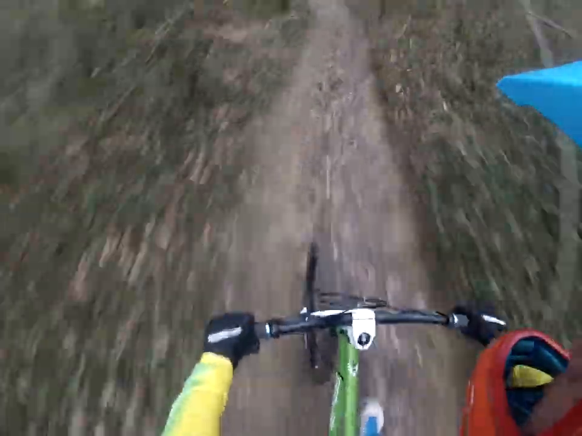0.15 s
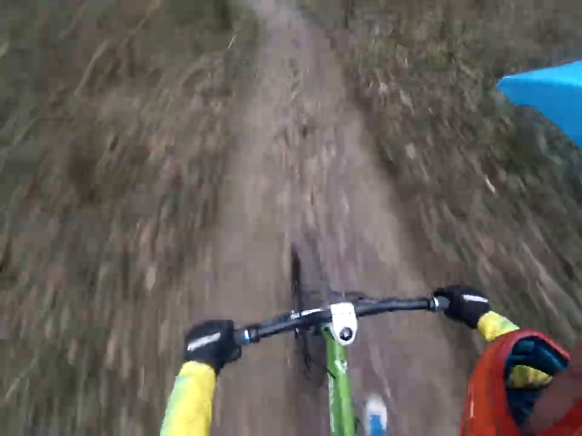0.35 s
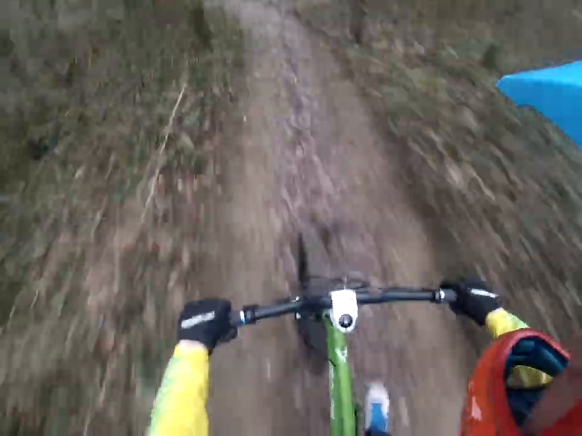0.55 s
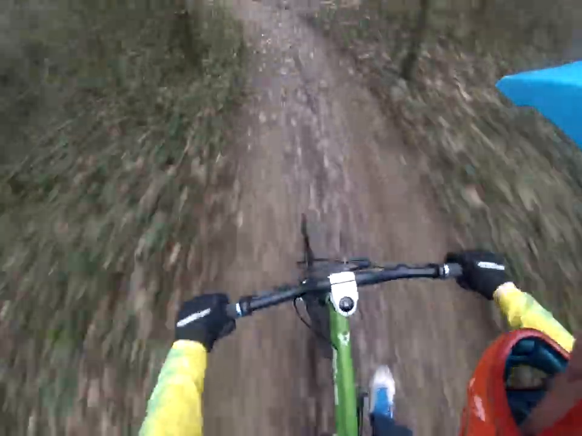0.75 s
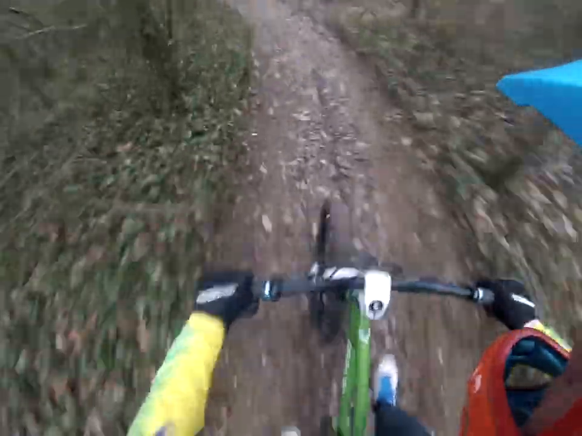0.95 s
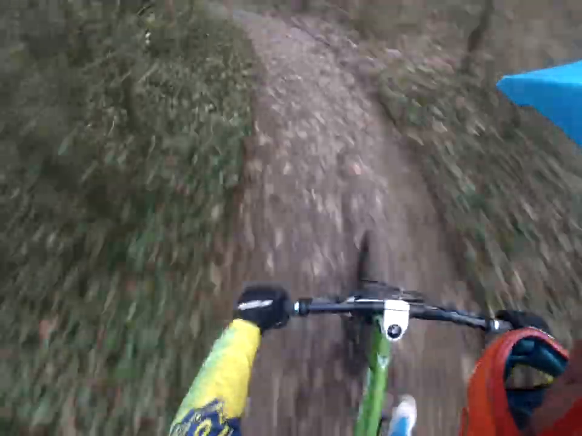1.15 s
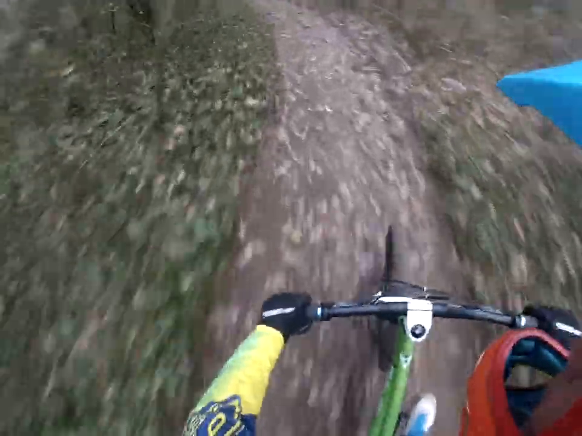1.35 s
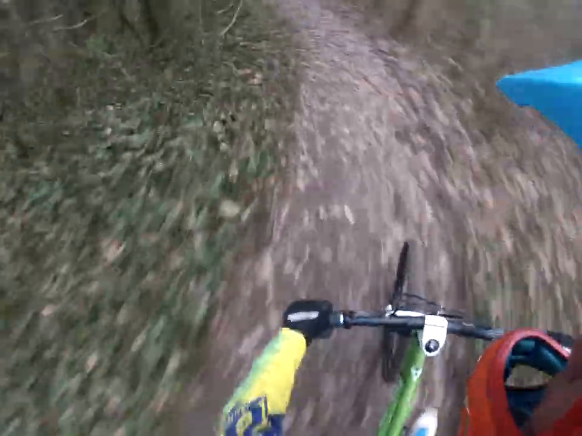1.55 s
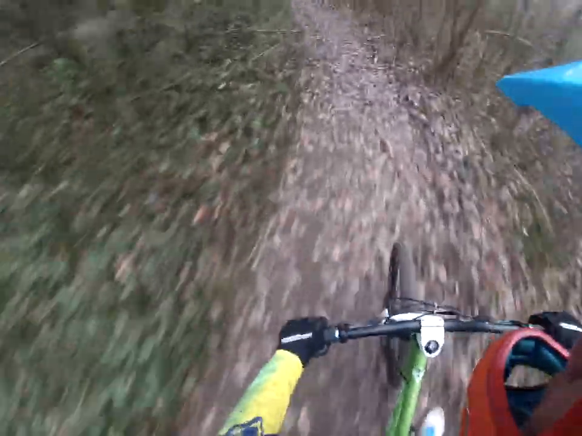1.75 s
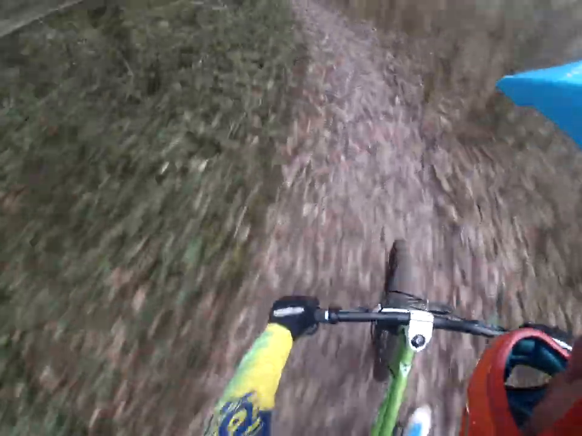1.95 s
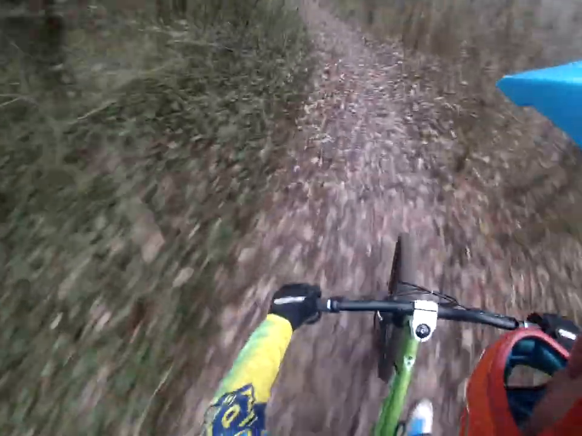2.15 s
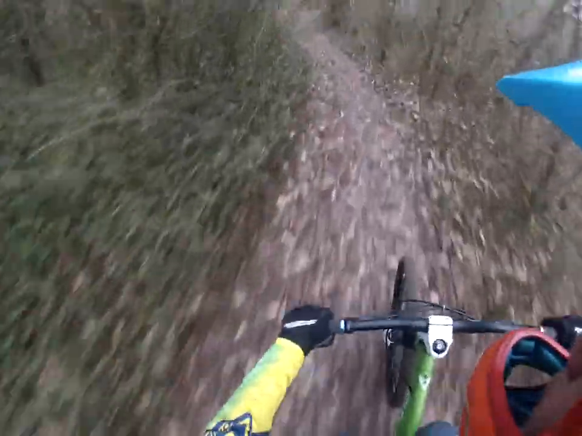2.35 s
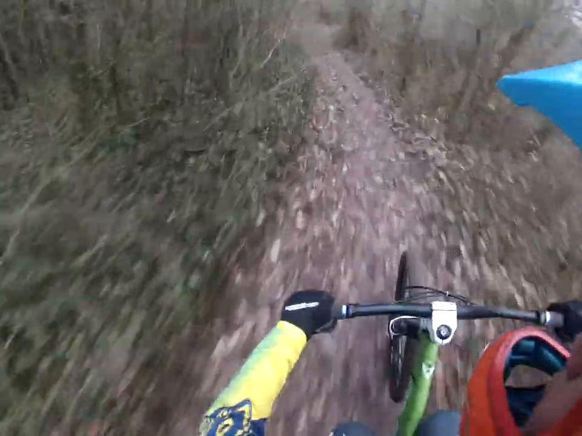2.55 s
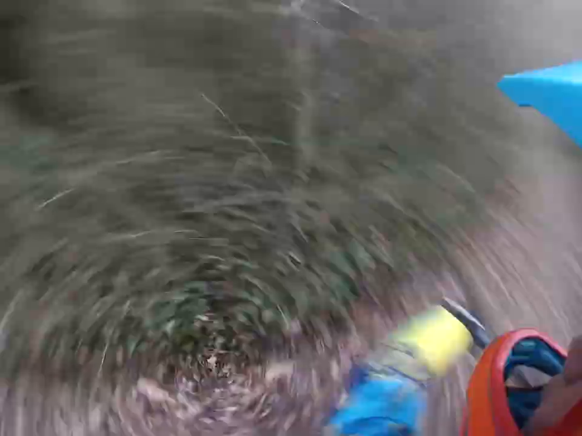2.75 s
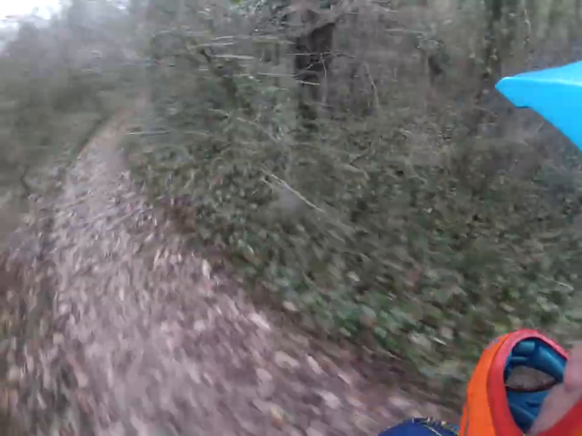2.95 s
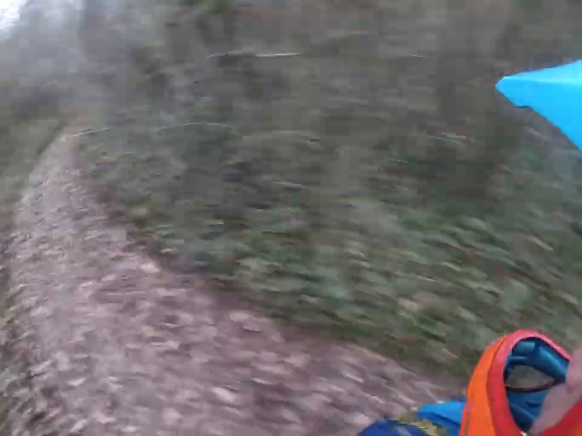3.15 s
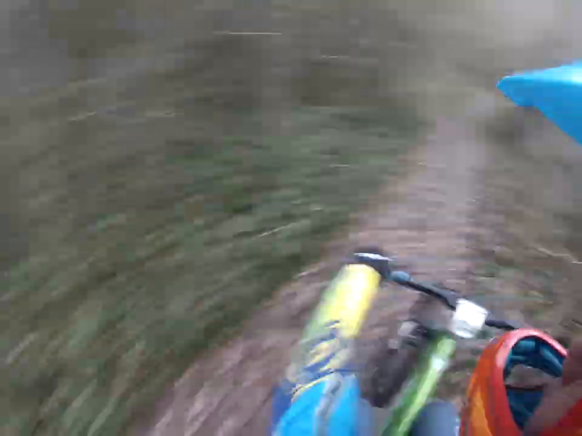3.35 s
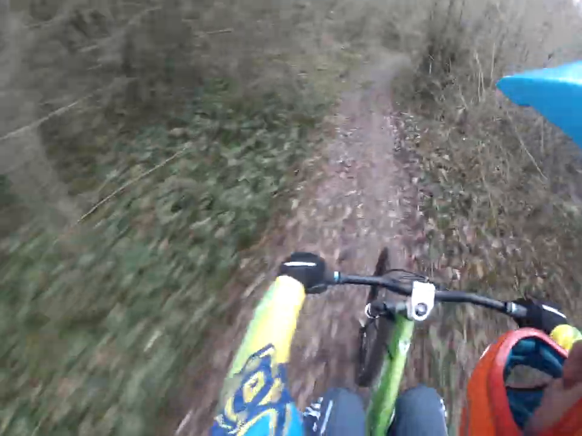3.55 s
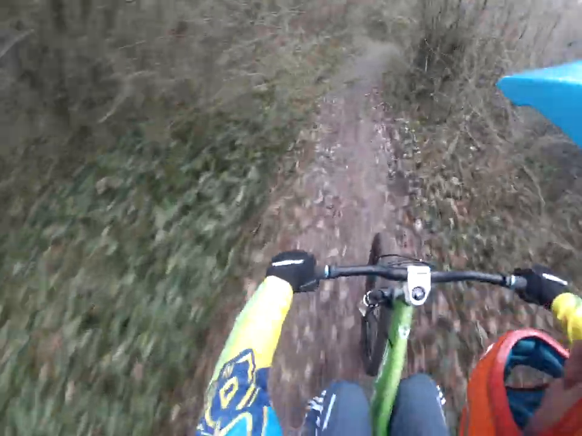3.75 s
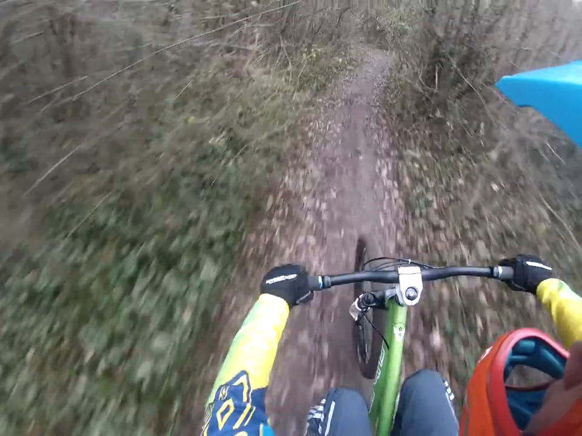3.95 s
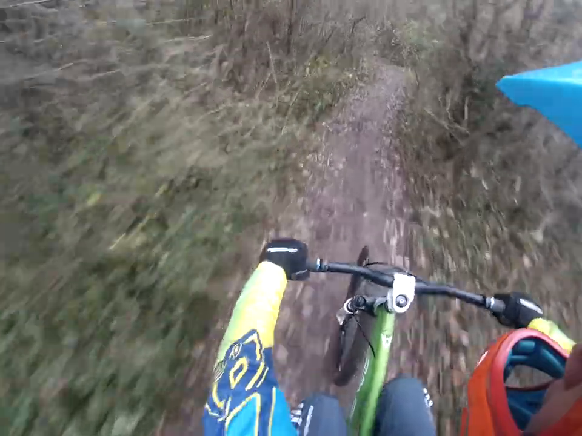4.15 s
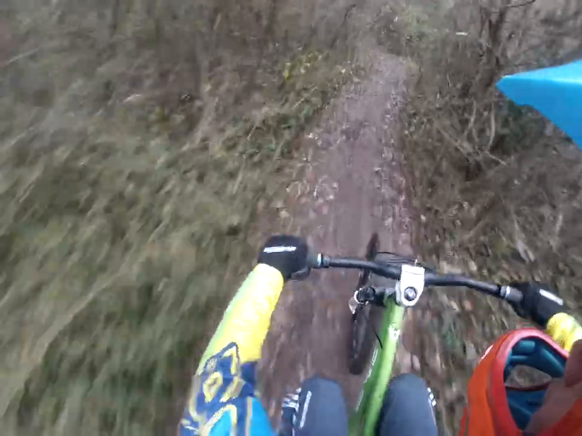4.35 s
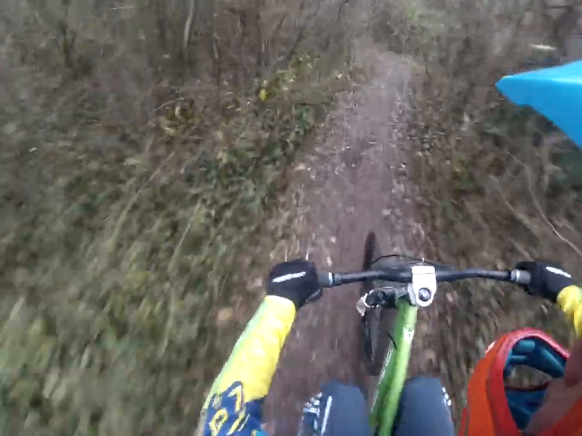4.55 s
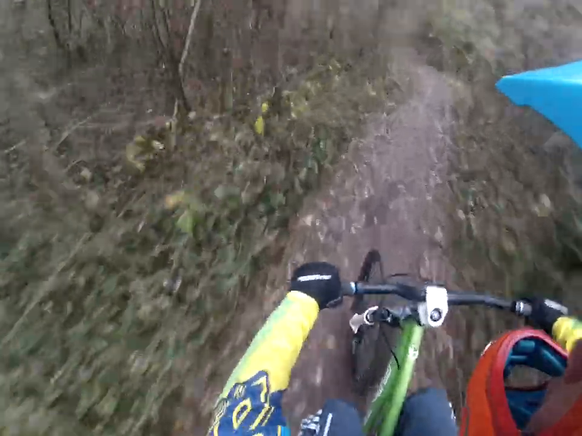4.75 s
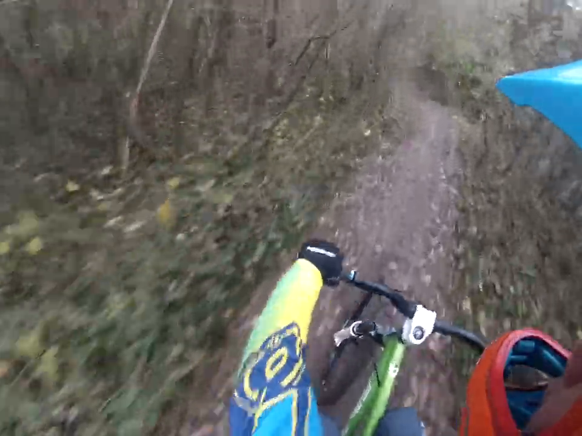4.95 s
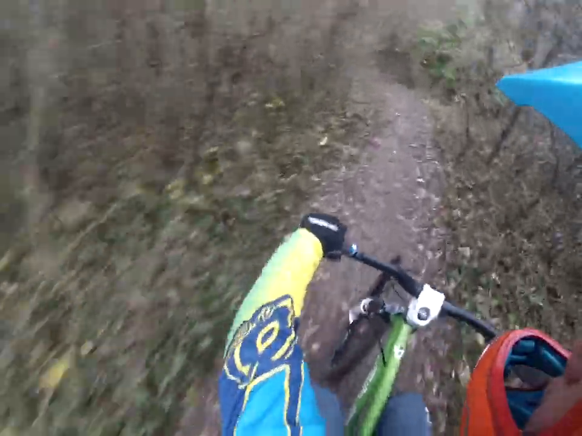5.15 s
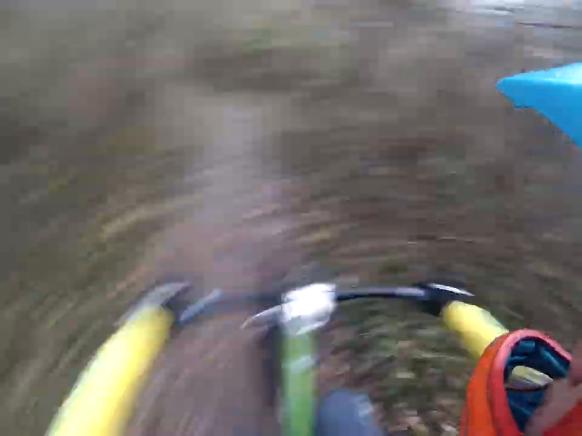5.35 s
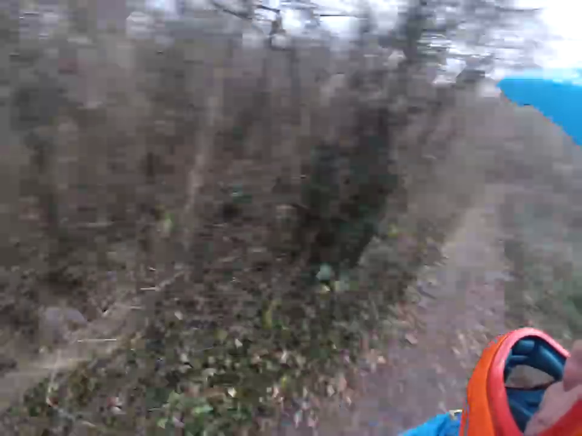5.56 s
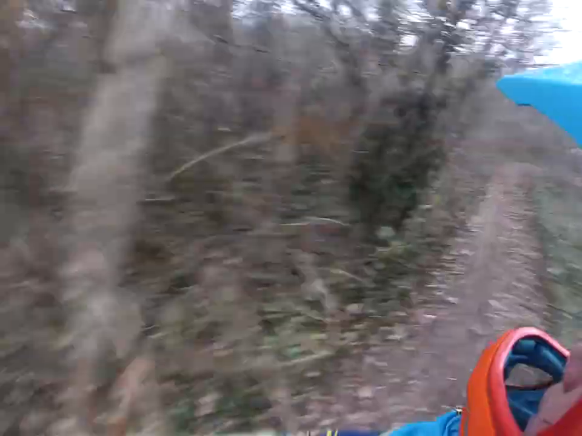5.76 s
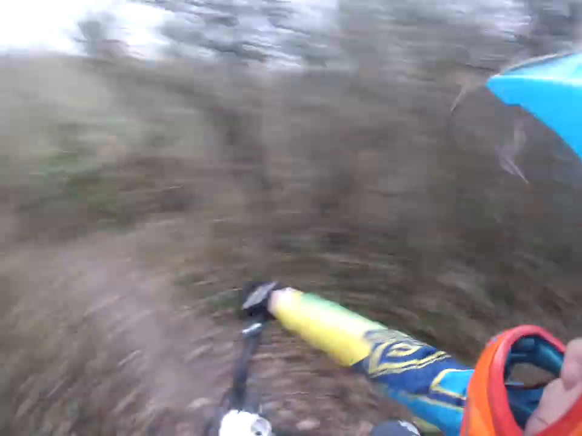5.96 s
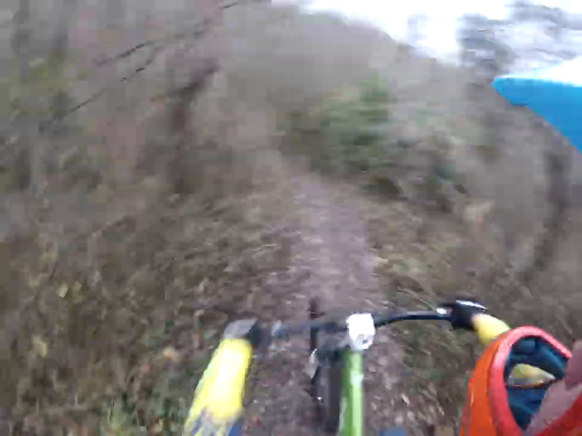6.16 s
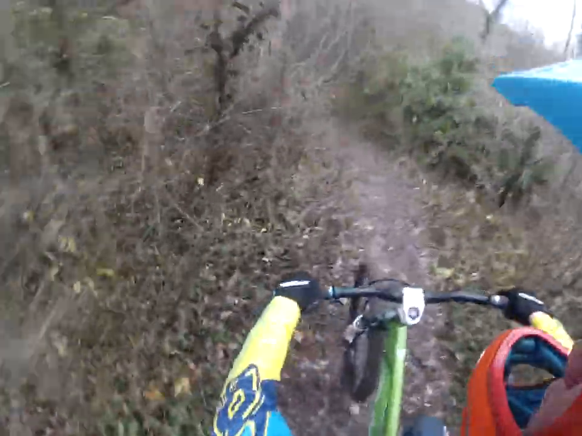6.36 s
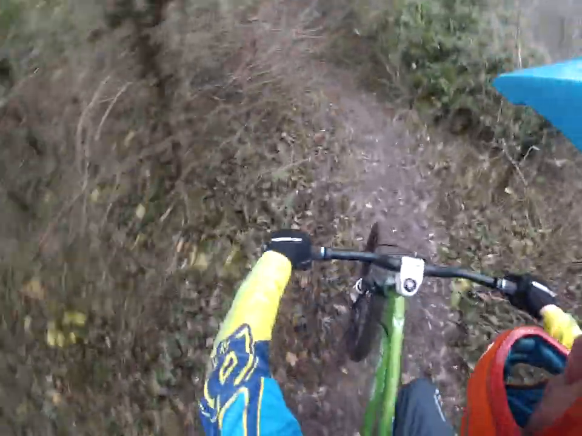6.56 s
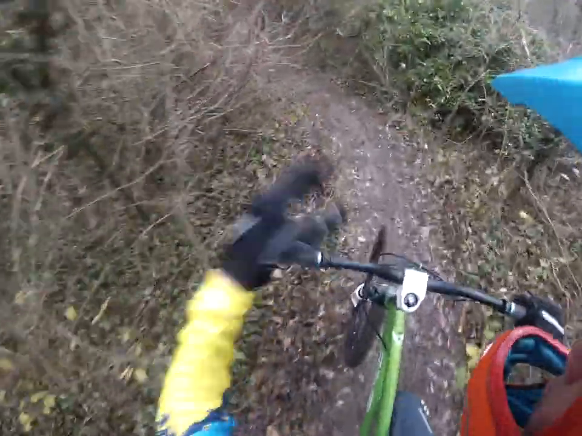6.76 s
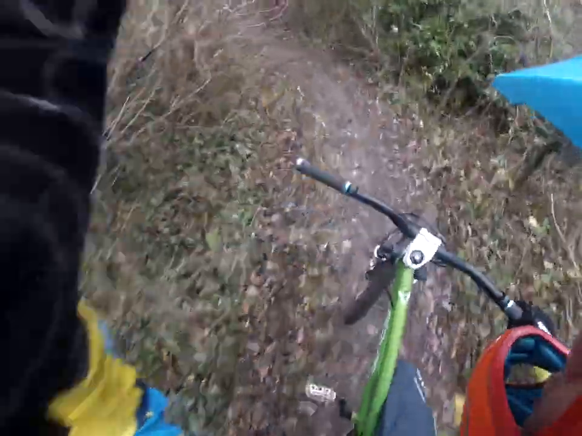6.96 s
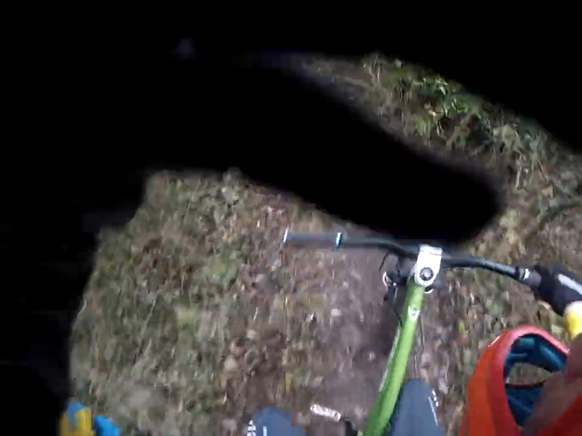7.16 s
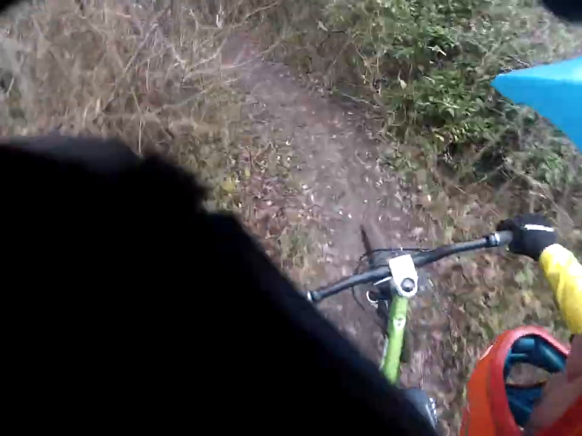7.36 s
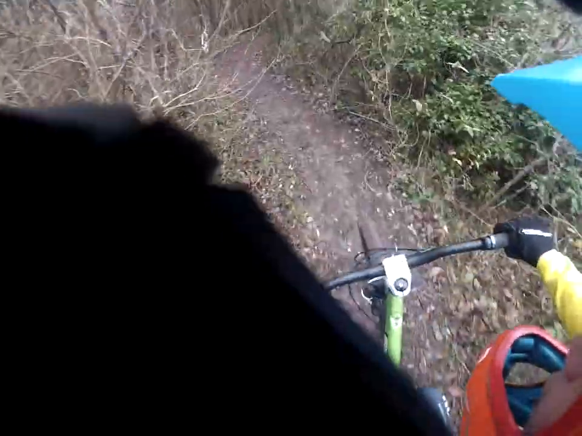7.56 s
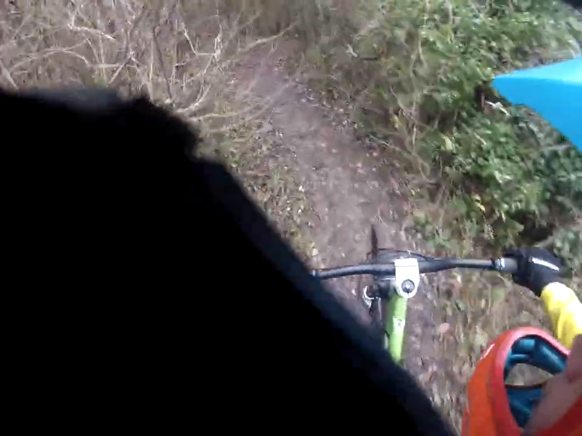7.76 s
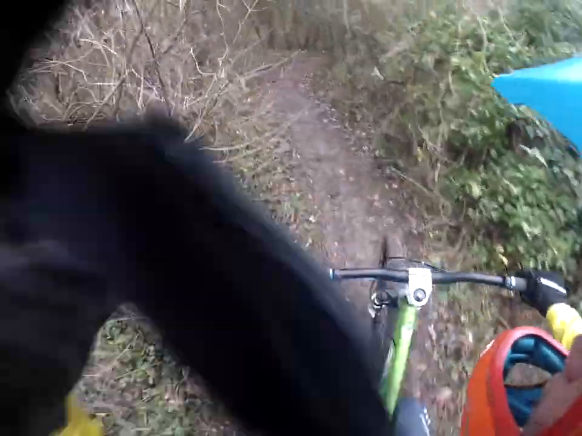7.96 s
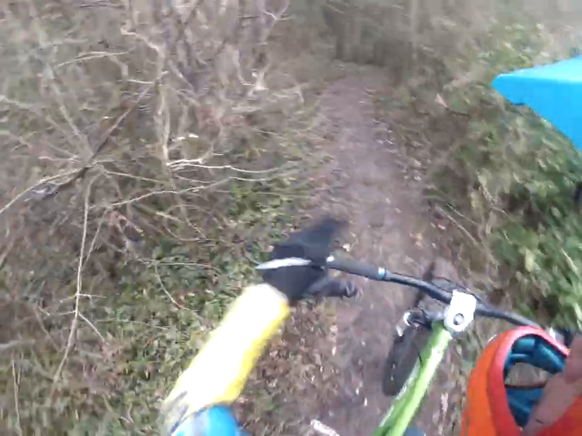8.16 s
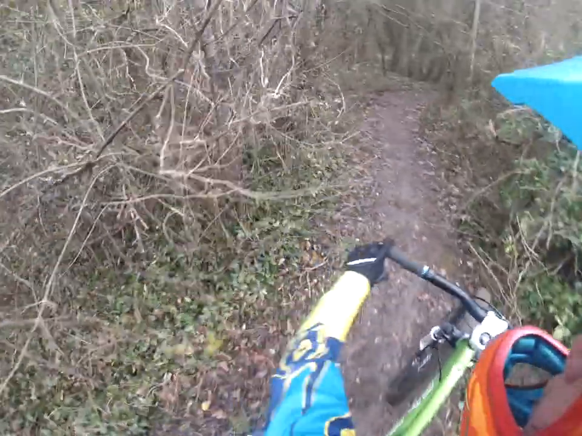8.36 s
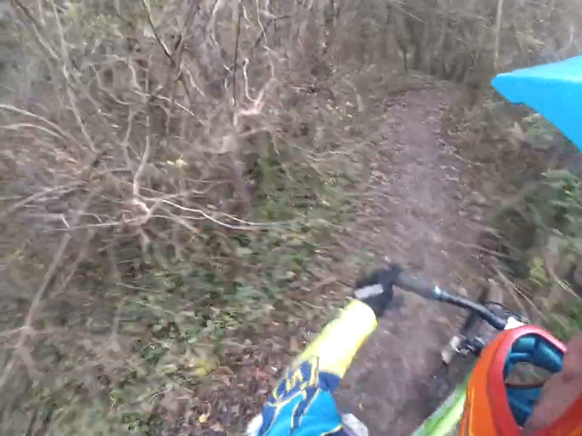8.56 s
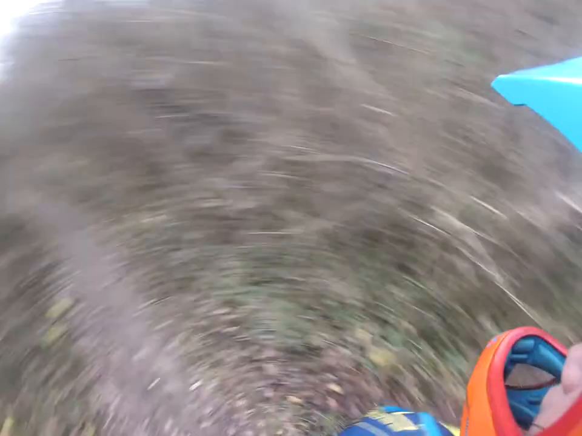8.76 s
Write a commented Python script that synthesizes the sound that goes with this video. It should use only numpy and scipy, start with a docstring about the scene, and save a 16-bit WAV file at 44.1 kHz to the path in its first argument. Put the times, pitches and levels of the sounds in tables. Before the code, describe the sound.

Helmet-mounted camera on a downhill mountain bike: low buffeting rumble, faint gritty tyre crunch, sharp mount knocks, then a gloved hand scraping and cracking loudly on the case.

```python
"""On a dirt trail a mountain bike runs downhill, heard from a camera in a plastic case on the rider's helmet.
Filtered noise gives buffeting, frame drone and hiss; random clicks give tyre crunch; jolts sway the helmet.
The helmet mount, a set of resonant modes, creaks under random slips and knocks under short blows.
Later a gloved hand grabs and wipes the case: stick-slip clicks drive its modes, and snags crack loudly.
After each release a damped hum and metal tones ring on; the latch clinks once."""
import sys
import numpy as np
from scipy import signal
from scipy.fft import rfft, irfft, next_fast_len
from scipy.io import wavfile
from scipy.ndimage import uniform_filter1d

SR = 44100
rng = np.random.default_rng(int(sys.argv[2]) if len(sys.argv) > 2 else 0)


def transcribe(signal):
    """Save signal, clipped to [-1, 1], as a 16-bit WAV file at the path in sys.argv[1]."""
    frames = np.atleast_2d(signal).T
    limited = np.clip(frames, -1, 1)
    pcm = np.round(limited * 32767).astype(np.int16)
    wavfile.write(sys.argv[1], SR, pcm)


N = 388080
TIME = np.arange(N) / SR
HUM_HZ = 102  # hum of the camera on its mount

# modes of the mount: (frequency [Hz], width [Hz], gain [dB])
MOUNT_MODES = [(197, 71, 2), (324, 29, 1), (500, 140, -11), (652, 96, -2.5), (1400, 113, 8.5),
               (1980, 120, -5), (2290, 120, -3), (2980, 160, -5.5), (3530, 300, -3.5)]
# modes of the case: (frequency [Hz], width [Hz], gain under a firm grip [dB], gain under a light wipe [dB])
CASE_MODES = [(1265, 160, -7, -9.5), (1596, 290, -2, -3), (2073, 140, -4, 7.5), (2194, 200, 2, -10),
              (2940, 250, -4.5, -10), (3390, 160, -11, -16), (4800, 430, -15.5, -13.5)]
# whistle of the rubbed case: (frequency [Hz], width [Hz], gain [dB])
WHISTLE_MODE = [(3789, 120, 1)]


def undb(db):
    """Level law: decibels to amplitude gain."""
    return 10 ** (np.asarray(db) / 20)


def unit(x):
    """Normalization: scale to an rms of 1."""
    return x / np.sqrt(np.mean(x ** 2))


def even(x, span_s):
    """Automatic gain: divide by the running rms, so that it stays near 1."""
    power = np.abs(uniform_filter1d(x ** 2, max(int(span_s * SR), 2)))
    return x / np.sqrt(power + 1e-12)


def add(out, s, x):
    """Superposition: mix x into out from time s, cut at the end."""
    i = max(int(s * SR), 0)
    out[i:i + len(x)] += x[:max(N - i, 0)]


def colour(x, points):
    """Minimum-phase filtering: a causal response through the points (frequency [Hz], gain [dB])."""
    hz, db = np.transpose(points)
    size = 2 * next_fast_len(len(x) // 2 + 2048)
    f = np.maximum(np.fft.rfftfreq(size, 1 / SR), 1)
    gain_db = np.interp(np.log(f), np.log(hz), db)
    cepstrum = irfft(np.log(undb(gain_db)))
    # folding the cepstrum onto positive times makes the filter causal
    cepstrum[1:size // 2] *= 2
    cepstrum[size // 2 + 1:] = 0
    return irfft(rfft(x, size) * np.exp(rfft(cepstrum)))[:len(x)]


def resonate(x, modes):
    """Modal superposition: parallel resonances (frequency [Hz], width [Hz], gain [dB])."""
    return sum(undb(db) * signal.lfilter(*signal.iirpeak(hz, hz / width, fs=SR), x)
               for hz, width, db in modes)


def ring_down(t, hz, t60):
    """Free damped oscillation: a sine that falls by 60 dB in t60 seconds."""
    return np.sin(2 * np.pi * hz * t) * np.exp(-np.log(1000) * t / t60)


def low_pass(x, hz, order):
    """Butterworth low-pass: attenuate what lies above hz."""
    return signal.sosfilt(signal.butter(order, min(hz, SR / 2 - 1), fs=SR, output="sos"), x)


def walk(n, rate):
    """Slow random modulation: normal values, rate per second, joined by straight lines."""
    at = np.arange(n) * rate / SR
    knots = int(at[-1]) + 2
    return np.interp(at, np.arange(knots), rng.standard_normal(knots))


def clicks(n, rate, scatter_db):
    """Shot noise: impulses at random moments, many weak and a few strong."""
    size = undb(scatter_db * np.minimum(rng.exponential(size=n), 4))
    return (rng.random(n) < rate / SR) * size * rng.choice([-1, 1], n)


def gate(n, rise_s, fall_s):
    """Contact envelope: a linear rise within rise_s and a squared fall within fall_s."""
    t = np.arange(n) / SR
    return np.clip(t / rise_s, 0, 1) * np.clip(t[::-1] / fall_s, 0, 1) ** 2


def hiss():
    """Microphone self-noise: steady noise with a fixed spectrum."""
    # spectrum: (frequency [Hz], gain [dB])
    hiss_colour = [(200, 7.5), (1000, 6.5), (3000, 3), (4400, -1), (5200, 0.5), (6200, -2.5), (9000, -5.5),
                   (12500, -6), (15500, -19)]
    return undb(-66.0) * unit(colour(rng.standard_normal(N), hiss_colour))


CRUISE_DB = -60  # tyre crunch at a cruising pace


def pace_db():
    """Source strength: how far the tyre crunch lies above that of a cruising pace."""
    # pace of the ride, as the level of the tyre crunch: (time [s], level [dB])
    pace = [(0, -54), (.3, -58.5), (.5, -53), (1.35, -54.5), (1.5, -57.5), (2.1, -56), (2.65, -60.5),
            (3.3, -61), (4.1, -65), (5.2, -67), (6.3, -63.5), (7, -66), (8.3, -69), (8.8, -66)]
    return np.interp(TIME, *np.transpose(pace)) - CRUISE_DB


def shaking():
    """Addition of powers: buffet and drone gains grow with pace and swell in spells of shaking."""
    # harder shaking, from rough ground or the hand: (time [s], length [s], buffet [dB], drone [dB])
    shakes = [(0.107, .25, -26.5, -72), (0.51, 0.18, -46, -53.5), (0.733, 0.48, -25, -64),
              (1.53, 0.49, -33, -70), (1.975, 0.28, -35, -57), (2.783, 0.75, -26, -58),
              (3.674, 0.59, -27, -64), (4.438, 0.36, -30.5, -62.5), (4.89, 0.42, -30, -76),
              (5.29, 0.43, -38, -58), (5.556, 0.85, -24, -56.5), (7.194, 0.21, -22, -72),
              (7.476, 0.38, -29, -70), (7.976, 0.17, -23, -69.5), (8.633, 0.33, -36.5, -59)]
    # gain at a cruising pace [dB], then its rise per dB of crunch
    buffet_db, buffet_per_db = -32, 0.56
    drone_db, drone_per_db = -59, 0.67
    pace = pace_db()
    buffet_power = undb(buffet_db + buffet_per_db * pace) ** 2
    drone_power = undb(drone_db + drone_per_db * pace) ** 2
    for s, length, shake_buffet_db, shake_drone_db in shakes:
        swell = gate(int(length * SR), rise_s=0.02, fall_s=0.11)
        add(buffet_power, s, swell * undb(shake_buffet_db) ** 2)
        add(drone_power, s, swell * undb(shake_drone_db) ** 2)
    return np.sqrt(buffet_power), np.sqrt(drone_power)


def rumble(buffet):
    """Forced vibration: buffeting shakes the case; each jolt sways the helmet for a cycle or two."""
    # spectrum of the buffeting: (frequency [Hz], gain [dB])
    buffet_colour = [(7, -25.5), (12, 0.5), (27, 0.5), (44, -2), (52, -5.5), (61, -19.5), (75, -28),
                     (110, -37), (200, -85)]
    # jolts that sway the helmet or thud on the case: (time [s], peak level [dB], sway frequency [Hz])
    jolts = [(0.744, -22, 35), (0.815, -8.5, 38), (1.034, -13.5, 34.8), (1.567, -16, 36.4),
             (2.884, -25.5, 103), (2.953, -10, 28.4), (3.11, -16.5, 36), (3.189, -15.5, 46.6),
             (3.438, -14.5, 26.7), (3.69, -10.5, 32), (4.533, -16.5, 29), (5.597, -12.5, 18),
             (5.717, -16.5, 66), (5.953, -12.5, 53), (7.088, -5.5, 42), (7.093, -12.5, 118),
             (8.038, -12, 66), (8.759, -20, 235), (8.778, -23.5, 170)]
    shake = even(colour(rng.standard_normal(N), buffet_colour), 0.074)
    out = low_pass(shake, 58.7, order=8) * buffet
    for s, db, hz in jolts:
        cycles = TIME[:SR // 2] * hz
        envelope = cycles ** 3 * np.exp(-cycles / .26)
        sway = envelope * np.sin(2 * np.pi * cycles)
        add(out, s, undb(db) * sway / np.abs(sway).max())
    return out


def tyres(ground):
    """Shot noise: the tyres crush grit in many tiny impacts, modulated by the ground."""
    # spectrum of the crunch: (frequency [Hz], gain [dB])
    tyre_colour = [(300, -26), (700, -11.5), (950, -14.5), (1200, -5), (1450, 2), (1850, -11.5),
                   (2200, -4.5), (2800, -19.5), (3600, -16), (4400, -26), (5300, -18.5), (6000, -31.5),
                   (6800, -21.5), (9000, -34.5)]
    grit = unit(colour(clicks(N, rate=2400, scatter_db=2.5), tyre_colour))
    return grit * undb(CRUISE_DB + pace_db() + 1.5 * ground - 0.03)


def frame_drone(ground, drone_gain):
    """Structure-borne sound: frame and camera mount drone over the uneven ground."""
    # spectrum of the drone: (frequency [Hz], gain [dB])
    drone_colour = [(70, -20), (110, -9), (150, -1.5), (210, 4), (310, -4.5), (450, -10.5), (700, -12.5),
                    (1100, -32), (2500, -57.5)]
    drone = unit(colour(rng.standard_normal(N), drone_colour))
    return drone * drone_gain * undb(2.2 * ground)


def mount_hum(buffet, drone_gain):
    """Resonance under random excitation: the mount hums with the shaking of the frame."""
    over_drone_db, over_buffet_db = 2, -32.5
    narrow = resonate(rng.standard_normal(N), [(HUM_HZ, 30, 0)])
    hum = unit(resonate(narrow, [(HUM_HZ, 50, 0)]))
    return hum * np.hypot(drone_gain * undb(over_drone_db), buffet * undb(over_buffet_db))


def knocks():
    """Impact excitation: the mount's play is used up, and a blow with a brief shudder rings its modes."""
    # knocks before a common 1 dB boost and low-pass: (time [s], peak level [dB], shudder decay [s])
    blows = [(.831, -39.5, 0.0043), (2.886, -20, 0.0029), (2.894, -34.5, 0.0087), (3.167, -37, 0.0086),
             (4.491, -40.5, 0.0089), (4.865, -45.5, 0.0079), (5.033, -40.5, 0.009), (5.339, -38, 0.006),
             (5.401, -43, 0.0046), (6.137, -34, 0.013), (6.871, -49.5, 0.016), (8.761, -23.5, 0.0065)]
    out, t = np.zeros(N), TIME[:SR // 10]
    for s, db, shudder_s in blows:
        shudder = rng.standard_normal(len(t)) * np.exp(-t / shudder_s)
        blow = np.exp(-t / 0.00012) + 0.13 * shudder
        ring = colour(resonate(blow, MOUNT_MODES),
                      [(300, 1), (650, 3), (1000, -6.0), (1410, -1), (2000, -5.0), (3500, -7.0)])
        add(out, s, undb(db + 1.0) * ring / np.abs(ring).max())
    return low_pass(out, 2800, order=6)


def stones():
    """Impulsive radiation: stones ping off the tyres as short resonant bursts of noise."""
    # pings: (time [s], peak level [dB])
    pings = [(.832, -42.5), (2.44, -47.5), (2.984, -47), (4.03, -51)]
    out, t = np.zeros(N), TIME[:SR // 30]
    for s, db in pings:
        tick = resonate(rng.standard_normal(len(t)) * np.exp(-t / 0.0037), [(4100, 3100, 0)])
        add(out, s, undb(db) * tick / np.abs(tick).max())
    return out


def creaks():
    """Stick-slip friction: the plastic joint creaks under load in short runs of slips."""
    # creaks before gating, a common 0.5 dB boost and low-pass: (time [s], length [s], level [dB])
    slip_runs = [(2.827, .05, -46.5), (2.898, 0.069, -46.5), (3, 0.034, -49), (3.204, 0.067, -47),
                 (3.342, 0.057, -51.5), (3.407, 0.048, -51.5), (3.675, 0.034, -46.5), (4.287, 0.047, -55),
                 (4.698, 0.044, -57), (4.795, 0.026, -51), (5.078, 0.035, -53), (5.35, 0.071, -48.5),
                 (5.512, 0.086, -50.5), (5.59, 0.053, -53.5), (6.25, 0.29, -55), (8.595, 0.085, -53),
                 (8.768, 0.051, -50)]
    out = np.zeros(N)
    for s, length, db in slip_runs:
        n = int(length * SR)
        slips = resonate(clicks(n, rate=2300, scatter_db=4.0), MOUNT_MODES)
        slips = colour(slips, [(300, 7), (1400, -3.5), (2300, -2.5), (3300, 4.5)])
        add(out, s, undb(db + 0.5) * unit(slips) * gate(n, rise_s=0.0095, fall_s=0.015))
    return low_pass(out, 2800, order=6)


def glove_slips(n, firmness):
    """Stick-slip friction: a firmer grip slips less often and less evenly."""
    lightness = 1 - firmness
    rate = 500 * firmness + 9000 * lightness  # slips per second
    scatter_db = 3 * firmness + 0.64 * lightness
    # the hand moves in jerks, so the slips swell and fade in bunches
    slips = clicks(n, rate, scatter_db) * undb(1.4 * scatter_db * walk(n, 190))
    return slips + 0.051 * rng.standard_normal(n)


def case_body(slips, firmness):
    """Modal excitation: the grip decides which modes of the stiff case ring."""
    # each placing of the hand shifts the modes by about 1.4 percent
    shifts = 1 + 0.014 * rng.standard_normal(len(CASE_MODES))
    modes = [(hz * shift, width, firm_db * firmness + light_db * (1 - firmness))
             for (hz, width, firm_db, light_db), shift in zip(CASE_MODES, shifts)]
    return colour(resonate(slips, modes),
                  [(450, -11.5), (950, -4.0), (1200, 5.0), (5000, -4.0), (9000, -15.5)])


def glove():
    """Friction-driven vibration: fabric slips on the case; a firm grip grates, a light wipe hisses."""
    # strokes: (time [s], length [s], scrape level [dB], then over the scrape: whistle [dB],
    # groan [dB], press [dB], and last the firmness [0-1])
    strokes = [(5.7, 0.036, -27, 9.5, 3, -0.5, .92), (5.723, 0.049, -29, -1, -5, -1.5, 0.78),
               (5.759, 0.073, -25, 5.5, -5.5, -2, 0.82), (5.826, 0.067, -23.5, -11, -8, -0.5, .95),
               (5.886, .068, -17.5, -16, -10, 0, .95), (5.952, .102, -17.5, -27, -15.5, 1, .95),
               (6.046, 0.052, -22.5, -13, -15, -12, .9), (7.078, 0.049, -27, -10.5, -13, 1, 0.38),
               (7.111, 0.12, -40, -17.5, -24.5, -9, 0), (7.175, 0.055, -31.5, -11, -12, -9, 0.086),
               (7.198, 0.12, -37, -3.5, -10, -13, 0.31), (7.27, 0.12, -30.5, -12, -18.5, -19, 0.21),
               (7.356, .095, -50, -6, -8, -5, .5), (7.44, .075, -51.5, -3, -6.5, -2, 0.43),
               (7.525, 0.066, -55, -9.5, -11, 4.5, 0.3), (7.599, 0.11, -50, -20, -12, -0.5, .4),
               (7.665, 0.086, -49.5, -12, -6, 1.5, 0.26), (7.755, 0.096, -51.5, -5, -4, 0.5, 0.56),
               (7.887, 0.056, -60, -3.5, 7, -3, .4), (7.928, 0.071, -42.5, -9.5, -9, -7, 0.33),
               (7.948, 0.06, -28.5, -14.5, -18.5, -11, 0), (7.977, 0.073, -40, 1.5, -10, 1, 0.13),
               (8.018, 0.072, -44.5, 0.5, 5, 9.5, 0.13)]
    # lowest mode of the case wall: (frequency [Hz], width [Hz], gain [dB])
    groan_mode = [(768, 120, 0)]
    # octave of the whistle: (frequency [Hz], width [Hz], gain [dB])
    octave_mode = [(7820, 240, 0)]
    # spectrum of the dragged fibres: (frequency [Hz], gain [dB])
    fizz_colour = [(2500, -29), (4400, -5), (5150, 3), (6200, -10), (7050, -4), (7500, -14), (7900, -9),
                   (8600, -15.5), (10200, -16), (11300, -9.5), (13000, -21), (15200, -21.5)]
    # spectrum of the bass pushed through the case: (frequency [Hz], gain [dB])
    press_colour = [(50, -6.5), (103, 10.5), (150, -8.5), (208, 0), (260, -4), (312, -2), (450, -14),
                    (800, -23.5), (2000, -58)]
    out = np.zeros(N)
    for s, length, scrape_db, whistle_db, groan_db, press_db, firmness in strokes:
        n, lightness = int(length * SR), 1 - firmness
        slips = glove_slips(n, firmness)
        body = even(case_body(slips, firmness), 0.022)

        whistle = even(resonate(resonate(slips, WHISTLE_MODE), [(3880, 900, 0)]), 0.038)
        octave = even(resonate(resonate(slips, octave_mode), octave_mode), .05)
        whistle += octave * undb(-22.5)

        # each slip drags many fibres after it for a moment
        drag = np.sqrt(signal.lfilter([1], [1, -np.exp(-1 / (0.00054 * SR))], slips ** 2))
        fizz = even(colour(drag * rng.standard_normal(n), fizz_colour), 0.08)
        # a light wipe stirs more fibres, and more still with a louder whistle
        fizz_db = -14 + lightness * (9 + 0.66 * whistle_db)

        groan = even(resonate(resonate(slips, groan_mode), [(781, 630, 0)]), 0.046)

        # a light touch pushes only the bass through, a firm grip up to 2.5 octaves more
        press_hz = 190 * 2 ** (2.5 * firmness)
        press = even(low_pass(colour(slips, press_colour), press_hz, order=2), .05)

        sound = body + whistle * undb(whistle_db) + fizz * undb(fizz_db)
        sound += groan * undb(groan_db) + press * undb(press_db)
        # a firm stroke starts and ends quickly; a light one swells and fades over shares of its length
        rise_s = .0015 + 0.26 * lightness * length
        fall_s = 0.0072 + .35 * lightness * length
        add(out, s, undb(scrape_db) * sound * gate(n, rise_s, fall_s))
    return out


def snags():
    """Sudden release of strain: a seam catches the case and snaps free, a crack with brief chatter."""
    # snags: (time [s], peak level [dB], chatter decay [s], whistle gain [dB])
    catches = [(5.7016, -7.5, .0045, 6), (5.721, -10, 0.0012, 7.5), (5.755, -15, 0.0016, 13),
               (5.769, -1.5, .0015, 5), (5.783, -4.5, 0.0017, 3.5), (5.83, -2, 0.0029, -0.5),
               (5.837, 2, 0.0027, 15), (5.853, 5.5, .0022, -13), (5.874, -2, .0012, -7),
               (5.896, -2.5, .0044, -15), (5.919, -1.5, 0.0061, 8), (5.963, -2.5, .0038, -21),
               (5.976, -5, .002, -8), (6.0006, -3, 0.0012, -12), (6.024, -5, 0.0011, -8),
               (6.033, -3.5, 0.00089, -6.5), (6.041, -1.5, .001, -4.5), (6.058, -6.5, 0.0017, -3.5),
               (6.083, -25, .002, 1), (6.135, -34, 0.0048, -8), (7.09, -21.5, .002, -8),
               (7.097, -9.5, 0.0012, -2), (7.954, -26, .005, -9)]
    # spectrum of the crack: (frequency [Hz], gain [dB])
    snag_colour = [(100, -16), (480, -20.5), (780, -0.5), (980, -1), (1200, 10.5), (1800, 3), (2300, 0),
                   (3300, -3.5), (3900, 2.5), (4400, -17.5), (5200, -12), (7000, -33), (9500, -35),
                   (15000, -26)]
    firm_modes = [(hz, width, firm_db) for hz, width, firm_db, _ in CASE_MODES]
    out, t = np.zeros(N), TIME[:SR // 20]
    for s, db, decay, whistle_db in catches:
        chatter = rng.standard_normal(len(t)) * np.exp(-t / decay)
        chatter[0] += 3  # the crack itself
        ring = undb(-5) * resonate(chatter, firm_modes)
        whistle = undb(whistle_db) * resonate(chatter, WHISTLE_MODE)
        snap = colour(chatter, snag_colour) + ring + whistle
        add(out, s, undb(db) * snap / np.abs(snap).max())
    return out


def ringing(hum_t60):
    """Free decay: let go, the camera shudders on its mount and the metal fittings sing faintly."""
    # the hand lets go: (time [s], mount hum [dB], metal ring gain [dB])
    releases = [(6.042, -16.5, -42), (8.044, -26, -64.5)]
    # modes of the metal fittings before the common fade: (frequency [Hz], gain [dB], t60 [s])
    fittings = [(1846, -3.5, 2.8), (1954, -24.5, .9), (3090, -18, 4), (3760, -16, 2), (4118, -17, 0.71),
                (5280, -25, 0.69), (5760, -25, 0.98), (6660, -25.5, 1.3)]
    out, t = np.zeros(N), TIME[:SR]
    hum = ring_down(t, HUM_HZ, hum_t60)
    metal = sum(undb(db) * ring_down(t, hz, t60) for hz, db, t60 in fittings)
    metal = metal * np.exp(-(t / .39) ** 6)  # the fittings settle after about 0.4 s
    for s, hum_db, metal_db in releases:
        add(out, s, undb(hum_db) * hum + undb(metal_db) * metal)
    return out


def latch():
    """Modal ring-down: the latch of the case drops back into its seat with one short clink."""
    # modes of the latch: (frequency [Hz], gain [dB], t60 [s])
    latch_modes = [(1345, -0.5, 0.093), (1600, -17, .25)]
    clink_s, clink_db = 6.147, -33
    out, t = np.zeros(N), TIME[:SR // 4]
    ring = sum(undb(db) * ring_down(t, hz, t60) for hz, db, t60 in latch_modes)
    add(out, clink_s, undb(clink_db) * ring)
    return out


def scene():
    """Superposition: the ride, the handling and the microphone's own hiss."""
    buffet, drone_gain = shaking()
    ground = walk(N, 28)  # unevenness that tyres and frame share
    ride = rumble(buffet) + tyres(ground) + frame_drone(ground, drone_gain)
    ride += mount_hum(buffet, drone_gain) + knocks() + stones() + creaks()
    handling = glove() + snags() + ringing(hum_t60=0.72) + latch()
    return (hiss() + ride + handling)[None]


def record(dry):
    """Overload and band limit: the recorder clips the hardest snaps, then cuts the top."""
    top_hz = 15300
    cut = signal.ellip(12, .2, 90, top_hz, fs=SR, output="sos")
    return signal.sosfilt(cut, np.clip(dry, -1, 1))


dry = scene()
out = record(dry)
transcribe(out)
```